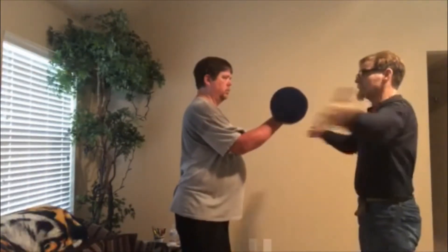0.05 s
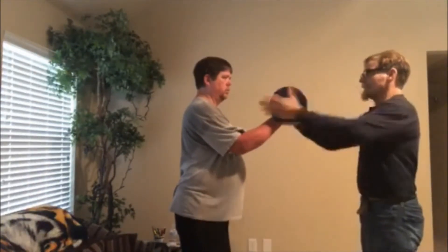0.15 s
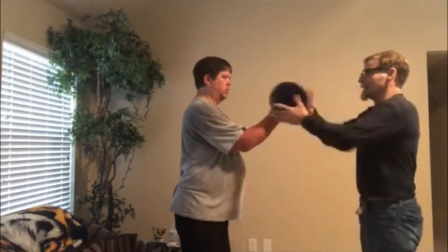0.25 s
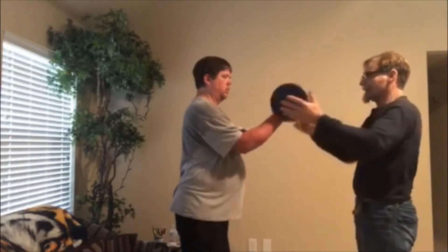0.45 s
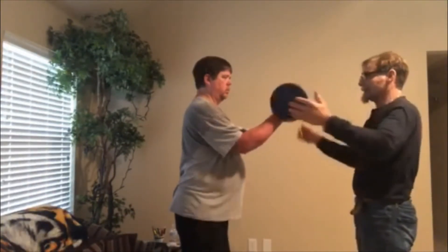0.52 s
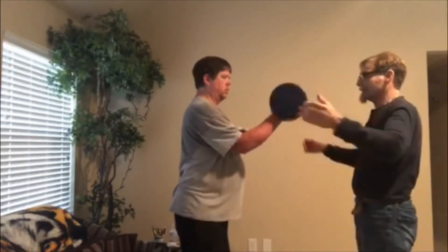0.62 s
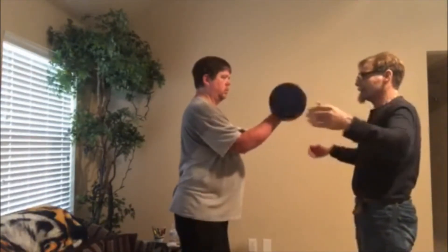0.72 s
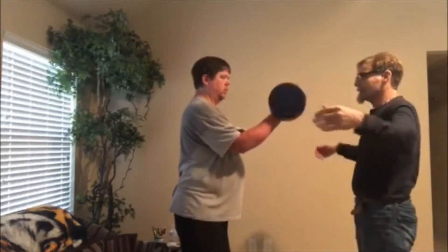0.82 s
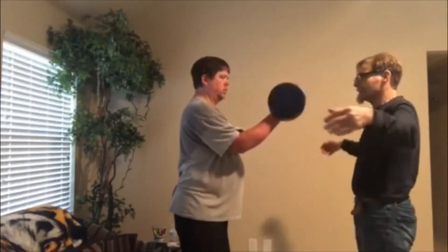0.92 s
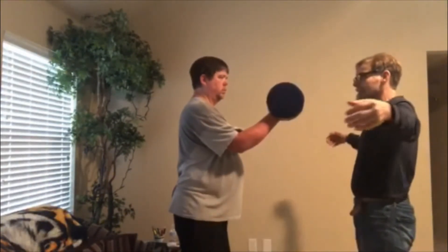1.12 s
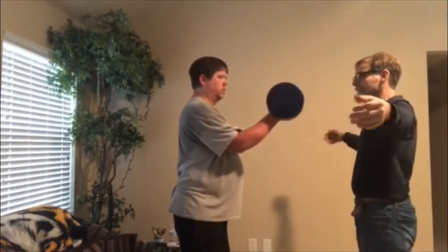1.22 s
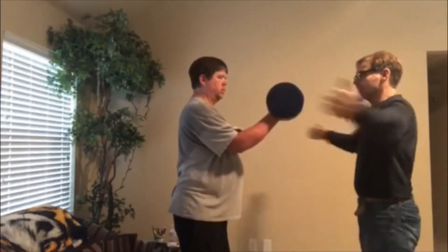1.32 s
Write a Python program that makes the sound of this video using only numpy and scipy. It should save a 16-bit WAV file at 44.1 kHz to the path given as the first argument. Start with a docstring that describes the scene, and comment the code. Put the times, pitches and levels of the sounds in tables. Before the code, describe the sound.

One loud slap of two hands on a padded round target comes at about 0.25 seconds, just after a barely audible sleeve swish. The hands land almost together near the microphone, making a single sharp crack with a hollow pop and light thump. The living room rings briefly, fading by about 0.8 seconds. Very faint ventilation and electrical hum lie underneath and continue to the end.

```python
"""Two-handed slap in a living room

Two hands slap a padded round target from both sides, 5 ms apart, near one microphone in a quiet room.
A sleeve swishes, fingers and palms each crack and pop a pocket of air, and the pad thumps.
From farther off, floor, ceiling and walls throw the slap back; the room booms and rings out
over soft ventilation and a faint mains hum."""
import sys
import numpy as np
from scipy import signal
from scipy.fft import rfft, irfft
from scipy.io import wavfile

SR = 44100
rng = np.random.default_rng(int(sys.argv[2]) if len(sys.argv) > 2 else 0)


def store_wav(level_fs):
    """Save 16-bit WAV to argv[1]."""
    pcm = np.round(np.clip(np.atleast_2d(level_fs), -1, 1) * 32767)
    wavfile.write(sys.argv[1], SR, pcm.T.astype(np.int16))


N = 59535
T = np.arange(N) / SR
FREQS = np.fft.rfftfreq(N, 1 / SR)

# fingers and palms landing on the pad:
# (time [s], crack level [dB], crack t60 [s], pop level [dB], pop pitch [Hz], pop t60 [s])
CONTACTS = [(0.2473, -9, 0.019, -5.5, 1165, .013), (0.2492, -13, 0.0016, -3.5, 1362, .005),
            (0.2523, -8, 0.018, -5.5, 2297, .004), (0.2537, -23.5, .005, 8, 1200, 0.0044)]
FIRST_HAND_S, SECOND_HAND_S = CONTACTS[0][0], 0.2522


def undb(db):
    """Decibels to gain."""
    return 10 ** (np.asarray(db) / 20)


def read(table, hz):
    """Look up a (frequency [Hz], value) table on a log-frequency axis."""
    points, values = np.array(table, float).T
    return np.interp(np.log(np.maximum(hz, 1)), np.log(points), values)


def noise(spectrum):
    """Noise of rms 1, coloured by a minimum-phase filter from a (frequency [Hz], level [dB]) table."""
    cepstrum = irfft(np.log(undb(read(spectrum, FREQS))), N)
    cepstrum[1:N // 2] *= 2
    cepstrum[N // 2:] = 0
    impulse = irfft(np.exp(rfft(cepstrum)), N)[:N // 8]
    coloured = signal.fftconvolve(rng.standard_normal(N), impulse)[:N]
    return coloured / coloured.std()


def strike(start, attack, t60):
    """Envelope: a smooth rise under an exponential decay; times in seconds."""
    age = np.maximum(T - start, 0)
    rise = np.sin(np.pi / 2 * np.minimum(age / attack, 1)) ** 2
    return rise * np.exp(-np.log(1000) * age / t60)


def ring(start, hz, attack, t60):
    """One damped mode."""
    return strike(start, attack, t60) * np.sin(2 * np.pi * hz * (T - start))


def slap(pad_start_s=0.2478, radiation_hz=120):
    """Each contact cracks and pops its trapped air; the pad thumps, too small to radiate deep bass."""
    # modes of the pad: (frequency [Hz], level [dB], t60 [s])
    pad_modes = [(189.5, -16, 0.1), (301, -16, .06), (432, -20, 0.035), (673, -13, 0.058),
                 (1018, -19.5, .025)]
    # skin hitting the cover: (frequency [Hz], level [dB])
    crack_spectrum = [(200, -9), (800, -6), (2000, -2.5), (3500, 2), (5500, -6), (9000, -19), (12000, -15),
                      (16000, -22.5)]
    out = sum(undb(db) * ring(pad_start_s, hz, attack=0.00053, t60=t60) for hz, db, t60 in pad_modes)
    skin = noise(crack_spectrum)
    for start, crack_db, crack_t60, pop_db, pop_hz, pop_t60 in CONTACTS:
        out += undb(crack_db) * skin * strike(start, attack=0.000069, t60=crack_t60)
        out += undb(pop_db) * ring(start, pop_hz, attack=0.00032, t60=pop_t60)
    return signal.sosfilt(signal.butter(2, radiation_hz, "high", fs=SR, output="sos"), out)


def fingertip_ticks(level_db=-3):
    """Fingertips snap against the cover with a tiny, bright ring."""
    # fingertip snaps: (time [s], level relative to the first [dB])
    snaps = [(0.2499, 0), (0.3603, -21)]
    return sum(undb(level_db + db) * ring(start, hz=10500, attack=1 / SR, t60=0.0004)
               for start, db in snaps)


def sleeve(level_db=-39.5, swell_s=0.028):
    """Cloth and air swish louder until the first hand lands."""
    # moving cloth: (frequency [Hz], level [dB])
    cloth_spectrum = [(40, -4.5), (200, -16), (500, -4.5), (1300, -11), (2500, -19.5), (4500, -21.5),
                      (8000, -35), (16000, -37)]
    since_blow = T - FIRST_HAND_S
    swell = np.maximum(1 + since_blow / swell_s, 0) ** 2 * (since_blow < 0)
    return undb(level_db) * noise(cloth_spectrum) * swell


def reflections(direct, mirror_top_hz=2200):
    """The nearest surfaces each send the microphone a dull mirror image and a burst of scatter."""
    # early reflections: (delay [s], mirror level [dB], scatter level [dB])
    echoes = [(.0108, -11.5, -17), (.0243, -15.5, -13), (.0322, -15.5, -8), (.0362, -8.5, -19),
              (.0480, -15.5, -21.5), (0.0585, -16.5, -15.5)]
    # sound scattered by furniture: (frequency [Hz], level [dB])
    scatter_spectrum = [(100, -17.5), (250, 2), (450, 7), (900, 4), (1500, -12.5), (2400, -8), (3800, -2),
                        (5500, -16), (9000, -23.5), (12000, -28.5), (16000, -27)]
    scatter = noise(scatter_spectrum)
    dull = signal.sosfilt(signal.butter(2, mirror_top_hz, fs=SR, output="sos"), direct)
    out = np.zeros(N)
    for delay, mirror_db, scatter_db in echoes:
        out += undb(mirror_db) * np.interp(T - delay, T, dull)
        out += undb(scatter_db) * scatter * strike(SECOND_HAND_S + delay, attack=0.0008, t60=0.025)
    return out


def reverberation(level_db=-11.5, delay_s=0.00067, late_db=-24.5, late_stretch=2.1):
    """The diffuse field builds and dies away in half-octave bands, treble first; a faint tail lingers."""
    # colour of the diffuse field: (frequency [Hz], level [dB])
    room_spectrum = [(30, -10), (70, -12), (130, 0.5), (260, 5), (430, 2), (850, 2), (1250, -4), (1650, -7),
                     (2200, -8), (2700, -11), (3900, -7), (5400, -13.5), (7600, -17.5), (9000, -24),
                     (12000, -22.5), (16000, -30)]
    # build-up of the field: (frequency [Hz], rise time [s])
    room_rise = [(100, 0.034), (400, .03), (4000, .034)]
    # decay of the field: (frequency [Hz], t60 [s])
    room_decay = [(60, 0.32), (200, .53), (1000, 0.56), (4000, 0.53), (7000, .45), (11000, 0.38),
                  (16000, .27)]
    centres = np.geomspace(32, 16384, 19)
    field = rfft(noise(room_spectrum))
    start = FIRST_HAND_S + delay_s
    out = np.zeros(N)
    for hz, one_band in zip(centres, np.eye(len(centres))):
        band = irfft(field * read(np.c_[centres, one_band], FREQS), N)
        rise, t60 = read(room_rise, hz), read(room_decay, hz)
        late_tail = undb(late_db) * strike(start, rise, late_stretch * t60)
        out += band * np.hypot(strike(start, rise, t60), late_tail)
    return undb(level_db) * out


def room_boom(start_s=0.265):
    """The strongest room modes swell after the blow and ring on."""
    # standing waves: (frequency [Hz], level [dB], rise time [s], t60 [s])
    room_modes = [(42.4, -35, .02, .33), (89, -28, .035, .26), (125.7, -14, .03, 0.22),
                  (187.6, -25.5, .02, 0.099), (255.8, -30.5, 0.017, 0.55), (319.5, -22.5, .02, 0.39),
                  (528.6, -27, 0.0087, .35), (761, -28, .02, .3), (858, -26, .02, 0.36),
                  (891, -25.5, .02, .35), (1050, -31, .02, .36), (1106, -33, .02, 0.16),
                  (1302, -33, 0.017, .65)]
    return sum(undb(db) * ring(start_s, hz, rise, t60) for hz, db, rise, t60 in room_modes)


def room_tone(air_db=-60.5, waver_db=2, waver_points=14):
    """Soft ventilation noise and a wavering mains hum lie under everything."""
    # ventilation: (frequency [Hz], relative level [dB])
    air_spectrum = [(25, -19.5), (60, -5), (110, 1), (170, -6), (280, -9.5), (400, -11.5), (650, -17),
                    (1000, -19), (2000, -28), (4000, -34), (7500, -36.5), (9000, -42), (16000, -48)]
    # mains harmonics: (frequency [Hz], rms level [dB])
    hum_partials = [(121, -67), (241, -74.5), (480, -73)]
    out = undb(air_db) * noise(air_spectrum)
    for hz, db in hum_partials:
        waver = np.interp(T, np.linspace(0, T[-1], waver_points), rng.standard_normal(waver_points))
        amplitude = np.sqrt(2) * undb(db + waver_db * waver)
        out += amplitude * np.sin(2 * np.pi * (hz * T + rng.random()))
    return out


def scene():
    """The hands up close, the room's answer and the room tone, in mono at the microphone."""
    direct = slap()
    hands = direct + fingertip_ticks() + sleeve()
    room = reflections(direct) + reverberation() + room_boom()
    return (hands + room + room_tone())[None]


def record(dry, top_hz=15700):
    """The microphone rounds the highest peaks; a steep low-pass cuts the top."""
    rounded = dry / (1 + dry ** 4) ** 0.25
    return signal.sosfilt(signal.ellip(8, 0.2, 70, top_hz, fs=SR, output="sos"), rounded)


dry = scene()
out = record(dry)
store_wav(out)
```